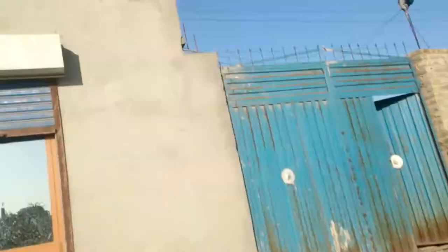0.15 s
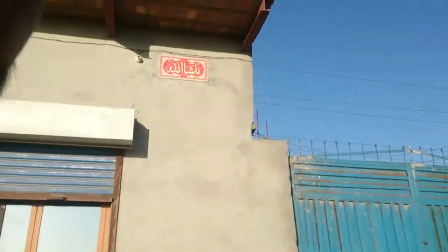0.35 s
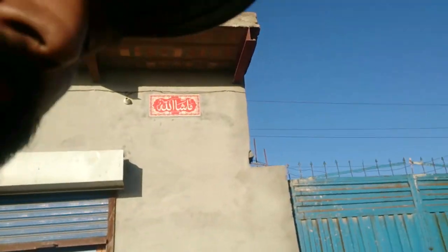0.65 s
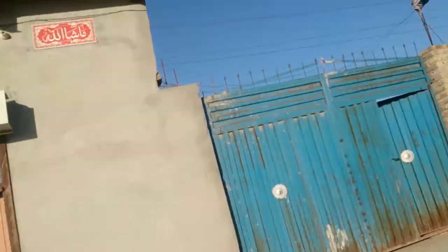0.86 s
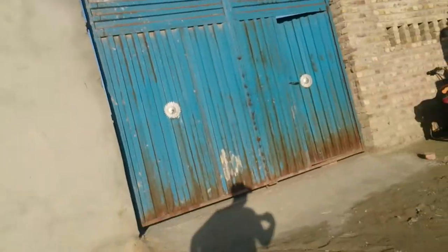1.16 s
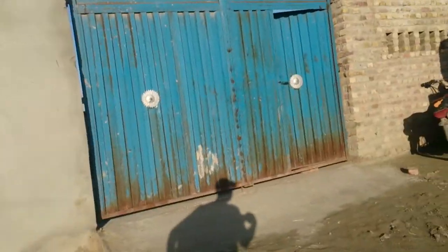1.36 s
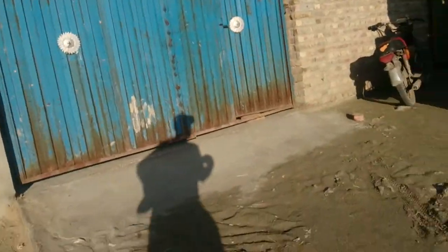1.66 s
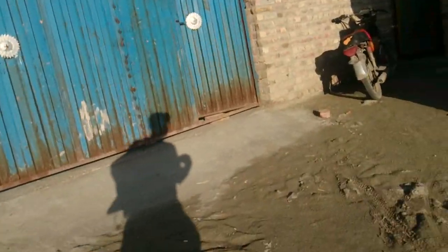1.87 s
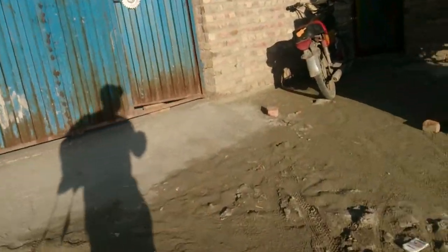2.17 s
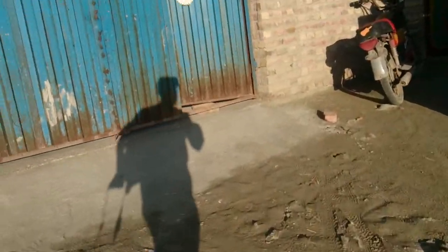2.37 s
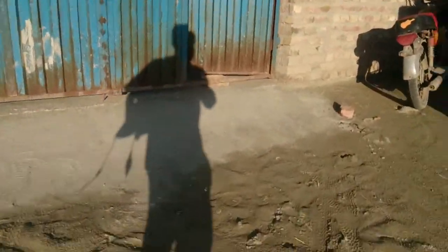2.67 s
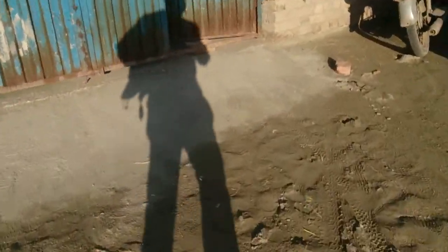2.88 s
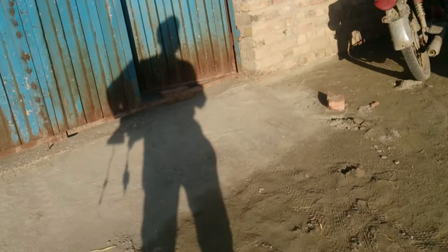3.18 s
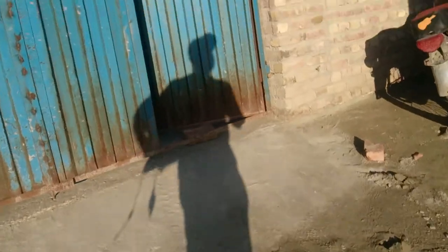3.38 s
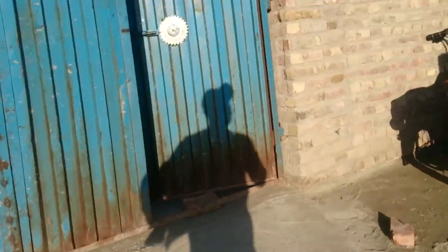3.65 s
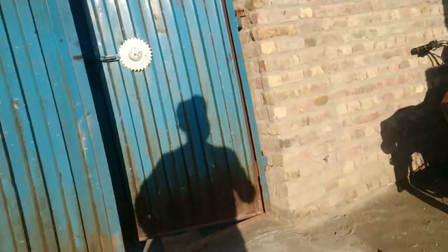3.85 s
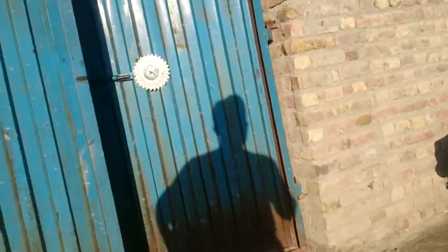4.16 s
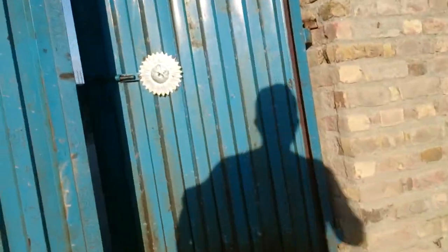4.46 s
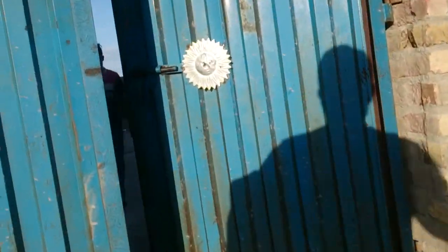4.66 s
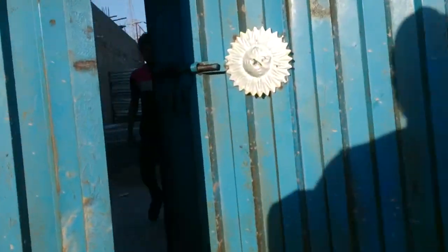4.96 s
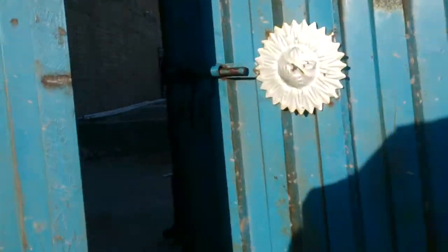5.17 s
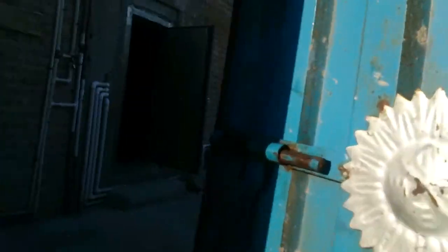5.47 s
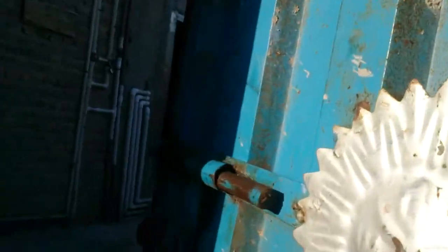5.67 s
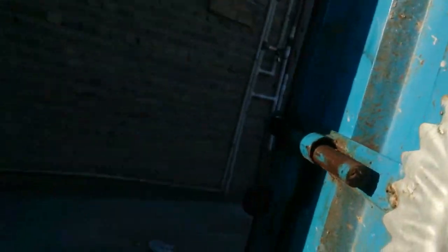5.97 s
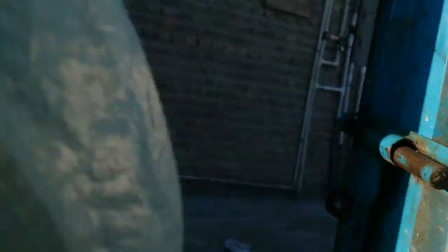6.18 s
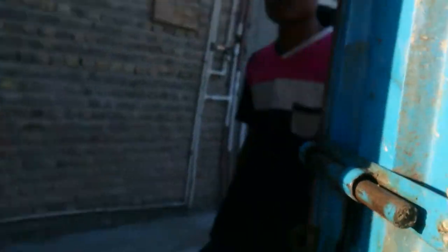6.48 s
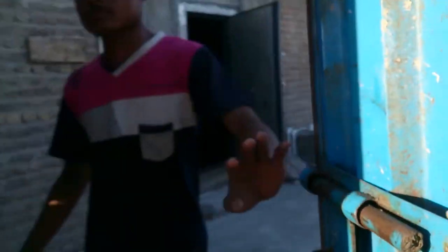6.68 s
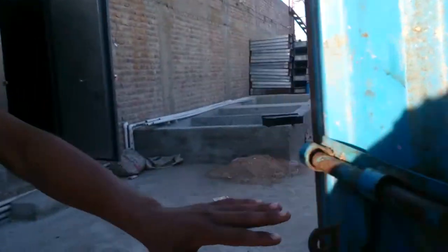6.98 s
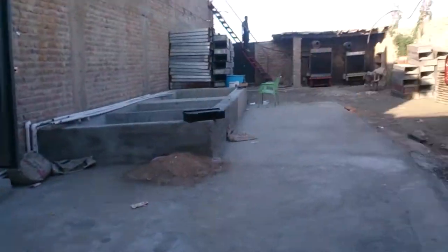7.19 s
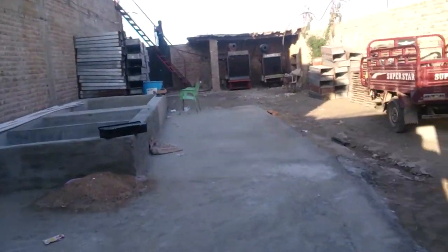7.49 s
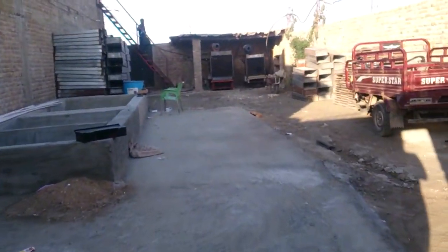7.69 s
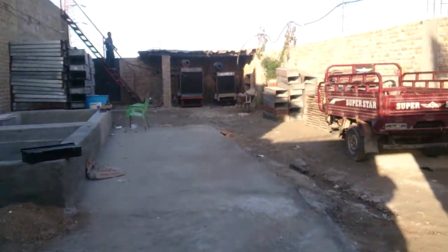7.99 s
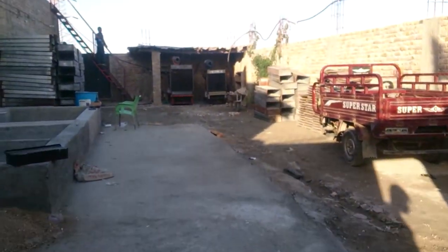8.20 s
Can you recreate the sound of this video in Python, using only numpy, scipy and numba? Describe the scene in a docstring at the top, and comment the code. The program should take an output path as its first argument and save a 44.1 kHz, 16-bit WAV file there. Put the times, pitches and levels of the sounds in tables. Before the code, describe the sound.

Handheld phone outdoors, walking toward a steel gate. A heavy engine thumps almost thirteen times a second behind it, with low drone and hollow ringing notes. Early finger knocks and soft air puffs come first, then a scraping metal bolt bang with a dull sheet boom. The beat grows strong, clothing rustles close by, and finally knock, rattle and whirr are loud and clear.

```python
"""A walled yard with a big slow diesel thudding in a building; a phone is carried up the lane to its gate.
The steel gate is unbolted with a bang: the exhaust beat swells in the gap, then the full clatter opens up.
Timed pulses ring pipe, engine house and echoes for the engine; shaped noise makes its rattle and rough gas.
Noise in short swells makes bolt, gate, grit, scuffs and cloth; fingers bump the phone, and air moves over
the microphones."""
import sys
import numpy as np
from scipy import signal
from scipy.fft import rfft, irfft
from scipy.io import wavfile
from scipy.ndimage import uniform_filter1d, map_coordinates
from numba import njit

SR = 44100
rng = np.random.default_rng(int(sys.argv[2]) if len(sys.argv) > 2 else 0)


def transcribe(signal):
    """Save signal, clipped to [-1, 1], as a 16-bit WAV file at the path in sys.argv[1]."""
    frames = np.atleast_2d(signal).T
    limited = np.clip(frames, -1, 1)
    pcm = np.round(limited * 32767).astype(np.int16)
    wavfile.write(sys.argv[1], SR, pcm)


N = 367794
TIME = np.arange(N) / SR
FREQ = np.maximum(np.fft.rfftfreq(N, 1 / SR), 1)

# exhaust beat, loudest in line with the gap in the gate [t/s, level/dB]
THUD_LEVEL = [(0.0, -26.5), (1.85, -29.5), (2.5, -28.5), (3.6, -28.5), (4.3, -24.5), (5.7, -13),
              (6.5, -10.5), (7.1, -13), (7.6, -17.5), (8.34, -20)]


def undb(db):
    """Decibels to gain."""
    return 10 ** (np.asarray(db) / 20)


def curves(table):
    """Each column of a table, joined by straight lines in time."""
    s, *columns = np.transpose(table)
    return [np.interp(TIME, s, column) for column in columns]


def unit(x):
    """Scale so that the middle of the two channels has rms 1."""
    return x / np.std(np.atleast_2d(x).mean(axis=0))


def steady(x):
    """Hold the slow level at 1 and keep the fast flutter."""
    power = uniform_filter1d(x.mean(axis=0) ** 2, size=SR // 4)
    return x / np.sqrt(power)


def colour(x, points):
    """Filter by (Hz, dB) points, falling at 36 dB per octave more beyond the ends; the result has rms 1."""
    hz, db = np.transpose(points)
    octaves_beyond = np.maximum(np.log2(hz[0] / FREQ), 0) + np.maximum(np.log2(FREQ / hz[-1]), 0)
    gain = undb(np.interp(np.log(FREQ), np.log(hz), db) - 36 * octaves_beyond)
    return unit(irfft(rfft(x) * gain, N))


def resonances(modes):
    """Response of a set of damped resonances, side by side."""
    return sum(undb(db) / (1 + 1j * (FREQ / hz - hz / FREQ) * hz / width) for hz, width, db in modes)


def chained(modes):
    """Response of damped resonances, one after the other."""
    return np.prod([resonances([mode]) for mode in modes], axis=0)


def delay(seconds):
    """Response of a plain delay."""
    return np.exp(-2j * np.pi * FREQ * seconds)


def reflect(x, lag_ms):
    """A copy that arrives later by a moving delay."""
    return np.array([np.interp(TIME - lag_ms / 1000, TIME, side) for side in x])


def pan(db):
    """Left and right gains for a level difference, left minus right, at the same mean power."""
    gains = undb(np.array([[1], [-1]]) * db / 2)
    return gains / np.sqrt(np.mean(gains ** 2, axis=0))


def ports(x, alike_hz):
    """Two unrelated signals become a diffuse field: alike in the bass, unrelated in the treble."""
    mid, side = rfft(x)
    side = side * FREQ / np.hypot(FREQ, alike_hz)
    # the sound reaches the right microphone port a little later
    return irfft(np.array([mid + side, (mid - side) * delay(0.00023)]), N)


def hiss(points):
    """Diffuse coloured noise."""
    return colour(ports(rng.standard_normal((2, N)), 590), points)


def room(x, t60):
    """A dense decaying tail for each channel, near the energy of the sound that feeds it."""
    tail = rng.standard_normal((2, N)) * np.exp(-np.log(1000) * TIME / t60)
    return irfft(rfft(x) * rfft(tail / np.linalg.norm(tail[0])), N)


def swell(start, rise, t60):
    """An envelope that grows for a moment and dies away."""
    age = TIME - start
    return np.clip(age / rise, 0, 1) * np.exp(-np.log(1000) * np.clip((age - rise) / t60, 0, 2))


def walk(rate):
    """A smooth random drift with a spread near 1."""
    hold = int(SR / min(rate, 100))
    steps = np.repeat(rng.standard_normal(1024)[:N // hold + 1], hold)[:N]
    return 1.3 * uniform_filter1d(uniform_filter1d(steps, hold), hold)


def grain(size):
    """A fast random level of rms 1, smoothed over a number of samples."""
    return unit(uniform_filter1d(rng.standard_normal(N), size=size))


def strokes(turns, place, scatter_db, jitter_s):
    """One pulse a cycle at a given crank position, each a little different in time and level."""
    chance = rng.standard_normal((int(turns[-1]) + 1, 2))
    times = np.interp(np.arange(len(chance)) + place, turns, TIME, right=2 * TIME[-1])
    times = times + jitter_s * chance[:, 0]
    at = (times * SR).astype(int)
    inside = (at >= 0) & (at < N)
    return np.bincount(at[inside], undb(scatter_db * chance[inside, 1]), N)


def air(opening):
    """Air swells on the microphones with every step in the lane, over a light breeze and a faint hiss."""
    # air pushed by a step [f/Hz, level/dB]
    step_colour = [(25, -13), (45, -4.5), (90, -1), (150, -2.5), (220, -15.5), (400, -25)]
    first_step_s, step_s = .35, .598
    crest_db, lull_db = -25.5, -27.5  # the lull is a drop below the crest
    lull = np.sin(np.pi * (TIME - first_step_s) / step_s) ** 4
    push = colour(rng.standard_normal((2, N)), step_colour) * undb(crest_db + lull_db * lull)
    breeze = colour(rng.standard_normal((2, N)), [(10, 0), (25, -4), (50, -7), (120, -17)])
    gusts = undb(-33 + 4.4 * walk(3.4))
    faint = hiss([(2000, -25.5), (6000, -7.0), (10000, 4.0), (15000, -7.5)]) * undb(-72.5)
    # the steps push mostly at the left microphone, and fade as the gate opens
    return pan(21.5) * push * (1 - opening) + pan(10) * breeze * gusts + faint


def tick(grit, s, db, t60, low, high, side_db):
    """A snap in one band, followed by its faint echo from the walls."""
    echo_db, echo_t60_s = -12, .26
    snap = unit(irfft(grit / (1 + (low / FREQ) ** 5 + (FREQ / high) ** 18), N))
    # a longer snap feeds the walls more
    echo = undb(echo_db) * np.sqrt(t60 / echo_t60_s) * swell(s, 0.012, echo_t60_s)
    return snap * undb(db) * (pan(side_db) * swell(s, .0006, t60) + pan(side_db / 2) * echo)


def walker():
    """Noise in short swells: ticks of grit and latch, grainy scuffs, and cloth buffeting the microphones."""
    # sharp ticks of grit and latch
    # [t/s, level/dB, t60/s, from f/Hz, to f/Hz, left minus right/dB]
    tick_rows = [(1.476, -27.5, 0.063, 900, 2200, -5), (1.487, -29, 0.046, 1490, 3300, -4),
                 (1.733, -28, 0.0091, 8520, 11500, -17), (1.857, -23.5, 0.02, 3660, 5430, -22),
                 (3.799, -7.5, .0045, 5500, 10700, -23), (4.709, -29, 0.045, 3830, 8850, -8),
                 (5.251, -28, .023, 5000, 11000, -20), (5.489, -21, .055, 3005, 6400, -8),
                 (6.107, -21, .008, 5000, 14000, -10), (6.115, -26, .008, 4000, 11000, -6),
                 (6.361, -16.5, 0.0064, 5500, 12840, 13), (6.734, -15.5, .08, 3000, 6000, -12)]
    # scuffs of shoes and cloth [t/s, level/dB, swell/s, t60/s, share of fine airy hiss/0-1]
    scuff_rows = [(.162, -51.5, 0.031, 0.23, 0.94), (.425, -48, 0.036, 0.18, 0.67),
                  (.875, -51.5, 0.0043, 0.16, 0.56), (.92, -61, 0.092, 0.18, 0.6),
                  (1.39, -44.5, 0.12, 0.22, 0.18), (1.474, -37, 0.017, 0.35, 0.47),
                  (4.909, -30.5, 0.023, 0.21, 0.01), (5.04, -33.5, .025, 0.13, 0.13),
                  (5.229, -31, 0.076, 0.2, 0.28), (5.48, -21.5, 0.011, 0.38, 0.16),
                  (5.72, -23, 0.056, 0.28, 0.2), (5.995, -19, 0.012, .1, 0.2),
                  (6.003, -10, 0.02, 0.38, 0.21), (6.024, -21, .008, .08, 0.54),
                  (6.04, -11.5, 0.013, 0.12, 0.33), (6.29, -23.5, 0.016, 0.68, 0.04),
                  (6.421, -31, 0.016, 0.13, 0.38), (6.838, -15.5, 0.056, 0.51, 0.14)]
    # coarse part of the scuffs [f/Hz, level/dB]
    coarse_colour = [(590, -45), (1000, 11), (1650, 11), (2580, 13.5), (3200, 6), (4250, 22.5), (5800, 13),
                     (7470, 5.5), (10900, -7), (15400, -71)]
    # fine airy part of the scuffs [f/Hz, level/dB]
    airy_colour = [(5000, -9), (7500, -10.5), (9500, 6), (15000, -11.5)]
    # cloth flapping past the microphones, then at 7.1 s a last push of air from a step [t/s, level/dB, swell/s,
    # t60/s]
    flap_rows = [(6.1, -10, 0.018, 0.84), (6.202, -9.5, 0.04, 0.42), (6.31, -7, 0.028, 0.31),
                 (7.1, -16, 0.058, 0.57)]
    grit = rfft(ports(rng.standard_normal((2, N)), 9000))
    ticks = sum(tick(grit, *row) for row in tick_rows)
    # each part crackles on its own
    coarse = hiss(coarse_colour) * undb(2.6 * grain(70))
    airy = hiss(airy_colour) * undb(2.6 * grain(70))
    scuffs = 0
    for s, db, rise, t60, fine in scuff_rows:
        scuffs = scuffs + ((1 - fine) * coarse + fine * airy) * undb(db) * swell(s, rise, t60)
    flapping = sum(undb(db) * swell(s, rise, t60) for s, db, rise, t60 in flap_rows)
    buffet = hiss([(20, -13), (45, -2), (100, 0), (190, -3), (320, -14)]) * flapping
    return ticks + pan(-7.0) * scuffs + buffet


def fingers():
    """A soft fingertip gives the right side of the phone one push a bump, and the case thuds briefly."""
    # fingers bumping the phone, level ahead of the panning [t/s, level/dB, contact/ms]
    bump_rows = [(.199, -24, .4), (.3137, -9, .22), (.3215, -18, .19), (.3696, -7, .26), (.394, -18, .24),
                 (.401, -2.5, .205), (.478, -22, .3)]
    # thud of the case [f/Hz, level/dB]
    case_colour = [(80, -34), (300, 9.5), (900, 2.5), (2200, -21), (3000, -19)]
    push = sum(undb(db) * np.exp(-((TIME - s) * 1000 / ms) ** 2) for s, db, ms in bump_rows)
    case = hiss(case_colour) * sum(undb(db - 16) * swell(s, 0.001, 0.03) for s, db, ms in bump_rows)
    return pan(-18) * (push + case)


def gate():
    """The bolt catches, shrieks and grinds home, each stage in its own band; the sheet steel booms."""
    # stages of the bolt: catch, shriek, ring, grind, groan of the leaf, last slip
    # [t/s, level/dB, swell/s, t60/s, from f/Hz, to f/Hz]
    bolt_rows = [(2.194, -24, .006, .14, 2150, 3050), (2.202, -16.5, .004, 0.12, 6800, 11800),
                 (2.205, -20, 0.012, .17, 3900, 5000), (2.204, -19.5, .008, 0.24, 2000, 15000),
                 (2.209, -24, 0.02, 0.34, 1100, 1750), (2.239, -33.5, .006, 0.23, 2200, 11800)]
    # scrape of the bolt [f/Hz, level/dB]
    bolt_colour = [(530, -34), (900, -13), (1180, -6), (1570, -4.5), (2000, -5.5), (2700, -0.5),
                   (3300, -1.5), (4250, -5.5), (5600, -7.5), (6930, -12), (8600, -12), (10100, -10.5),
                   (11600, -12), (12600, -17.5), (15400, -20.5)]
    # ringing of the bolt [f/Hz, width/Hz, level/dB]
    bolt_modes = [(1540, 90, -1), (2250, 90, 2), (2630, 80, -3.5), (4180, 170, 4.5), (6830, 90, 3),
                  (7850, 200, 2), (8400, 130, 5.5), (11100, 170, 9)]
    # dull booms of the gate and heavy steps [t/s, level/dB, swell/s, t60/s]
    boom_rows = [(1.47, -21, 0.0091, 0.56), (2.199, -14.5, 0.037, 0.49), (2.266, -9.5, 0.006, 0.088),
                 (2.305, -19, 0.0087, 0.36), (2.738, -25, 0.0067, 0.16)]
    # boom of the sheet steel [f/Hz, level/dB]
    gate_colour = [(60, -22), (100, 3), (150, -5.5), (320, 0.5), (500, -14.5), (750, -22), (1000, -25.5),
                   (1500, -31), (1900, -26)]
    shudder = undb(1.5 * grain(90))
    scrape = hiss(bolt_colour)
    ring = unit(irfft(rfft(scrape) * resonances(bolt_modes), N))
    metal = rfft(scrape + 0.8 * ring)
    bolt = 0
    for s, db, rise, t60, low, high in bolt_rows:
        band = unit(irfft(metal / (1 + (low / FREQ) ** 16 + (FREQ / high) ** 16), N))
        bolt = bolt + band * undb(db) * swell(s, rise, t60)
    boom = hiss(gate_colour) * sum(undb(db) * swell(s, rise, t60) for s, db, rise, t60 in boom_rows)
    return shudder * pan(-2.2) * bolt + pan(-1.1) * boom


def ringing(turns):
    """Once a cycle a knock sets a hollow note of the engine house ringing, now harder, now softer."""
    # the hollow note, two resonances in a row [f/Hz, width/Hz, level/dB]
    note_modes = [(332, 16, 0), (342, 80, 0)]
    # loudness of the hollow note [t/s, level/dB]
    note_level = [(0, -47), (2.5, -49), (2.9, -39.5), (3.17, -26), (3.45, -35.5), (3.9, -36.5),
                  (4.15, -25.5), (4.42, -45.5), (4.7, -24), (4.83, -31), (5.05, -18.5), (5.35, -48),
                  (5.9, -49), (6.3, -36), (6.58, -23), (6.85, -48), (7.5, -41.5), (7.77, -17), (8.05, -38),
                  (8.34, -15)]
    knocks = rfft(strokes(turns, place=.2, scatter_db=3, jitter_s=.0002))
    note = unit(irfft(knocks * chained(note_modes), N))
    breath = hiss([(280, -14.5), (335, -2.0), (400, -9.5)])
    return pan(-1.5) * steady(note + 0.39 * breath) * undb(curves(note_level)[0])


def exhaust(turns):
    """Each firing thumps the pipe, echoes round the yard and keeps the engine house droning."""
    # exhaust pipe and silencer, one after the other [f/Hz, width/Hz, level/dB]
    pipe_modes = [(128, 34, 6), (155, 120, 0)]
    # low modes of the engine house [f/Hz, width/Hz, level/dB]
    house_modes = [(38, 8, -19.5), (51, 9, -34), (73.2, 12, 10.5), (93, 18, 8), (99.8, 5.9, 24)]
    # exhaust paths round the yard [delay/s, gain]
    yard_paths = [(0, .8), (.0075, 1), (.0325, .75), (.052, .2), (.0635, .12)]
    # weight of the smeared beat, arriving by many reflections, and its gas noise [t/s, gain]
    smear_share = [(0, .4), (3.8, .37), (4.4, .19), (5.9, .12), (6.6, .18), (7.1, .38), (8.34, .55)]
    drone_db, drone_slope = -21.5, 0.33  # dB when the thud is at 0 dB; dB per dB of thud
    thud_db, = curves(THUD_LEVEL)
    # from the left in the lane to nearly ahead at the gate (s; left minus right, dB)
    pan_db = np.interp(TIME, [0, 4.5], [8, -1.5])
    puffs = rfft(strokes(turns, place=.415, scatter_db=2.2, jitter_s=.00015))
    paths = sum(gain * delay(s) for s, gain in yard_paths)
    direct = irfft(-puffs * chained(pipe_modes) * paths, N)
    direct = colour(direct, [(70, -21.5), (120, -2.0), (190, 5.0), (260, -11.5), (450, -18)])
    # the beat is crisp in line with the gap, and smeared behind the gate or inside the yard
    gas = hiss([(40, -40), (95, 10), (170, 3.5), (230, -9.0), (300, -41.0)])
    smeared = unit(ports(room(direct, t60=.36), 300)) + gas
    thud = steady(direct + curves(smear_share)[0] * smeared)
    house = resonances(house_modes) * resonances([(75.7, 9, 0)]) * delay(0.02166)
    drone = unit(irfft(puffs * house, N))
    # the drone follows the thud, but less steeply
    return pan(pan_db) * (thud * undb(thud_db) + drone * undb(drone_db + drone_slope * thud_db))


def bark(turns):
    """Rough gas leaves the pipe with each firing and slaps back from the wall, never twice alike."""
    # rough gas [f/Hz, level/dB]
    gas_colour = [(240, -12.5), (330, -0.5), (480, 1.5), (650, -5), (1000, -11.5), (1500, -16), (2500, -32)]
    level_db, slope = -17.5, 1.16  # dB when the thud is at 0 dB; dB per dB of thud
    puffs = strokes(turns, place=.22, scatter_db=3.5, jitter_s=.001)
    slaps = strokes(turns, place=.56, scatter_db=3.5, jitter_s=.001)
    # each puff swells and fades with a time constant of 4.5 ms
    age = TIME[:SR // 10] / .0045
    fading = signal.fftconvolve(puffs + .6 * slaps, age * np.exp(1 - age))[:N]
    gas = colour(ports(fading * rng.standard_normal((2, N)), 900), gas_colour)
    return pan(-1.5) * gas * undb(level_db + slope * curves(THUD_LEVEL)[0])


def clatter(turns, repeat, t60, ring_s, rattle):
    """Metal blows ring the engine house on every cycle; loose parts rattle at random after each."""
    # valves, piston slap and combustion within one cycle [share of the cycle, level/dB]
    blow_rows = [(0.14, 7.5), (0.269, 7.5), (.53, 5.5), (0.629, 8.5), (0.76, 6.5), (0.909, 4.5)]
    blows = sum(undb(db) * strokes(turns, place, scatter_db=2.1, jitter_s=.00008) for place, db in blow_rows)
    fading = signal.lfilter([1], [1, -np.exp(-1 / (ring_s * SR))], blows ** 2)
    loose = unit(np.sqrt(1 + rattle * fading / fading.mean()) * rng.standard_normal((2, N)))
    # four patterns of echoes drift in and out, so no ringing line stays for long
    echoes = steady(sum(walk(3) * room(blows, t60) for _ in range(4)))
    return ports(loose + repeat * echoes, 1660)


def patchy(x, opening):
    """Narrow bands swell and sink on their own as the listener moves among the echoes; less in the open."""
    depth_db, changes_per_s = 3.8, 11  # depth behind a shut gate
    hz, s, bins = signal.stft(x, SR, nperseg=2048)
    field = rng.standard_normal((160, 200))
    # bands widen with frequency
    row = 10 * np.log2(1 + hz / 250) + hz / 250
    place = np.meshgrid(row, s * changes_per_s, indexing="ij")
    depth = depth_db * (1 - 0.48 * np.interp(s, TIME, opening))
    gain = undb(depth * map_coordinates(field, place, order=1, mode="mirror"))
    return signal.istft(bins * gain, SR)[1][:, :N]


def machinery(turns, opening):
    """Block rumble, combustion roar, diesel knock and gear whirr, muffled by the gate until it opens."""
    # colours behind the shut gate and in the open yard [f/Hz, level/dB]
    shut_block, open_block = [(130, -12), (220, 5), (270, -3.5), (296, -1.5), (333, 4), (371, -10.5),
                              (450, 0.5), (560, -21.5), (730, -38), (1230, -120)], [(130, -7.5), (205, -4.5), (275, -2.5), (305, -4.5),
                                                  (334, -2), (377, -8), (414, -6), (486, -7), (560, -4),
                                                  (730, -16), (1230, -120)]
    shut_roar, open_roar = [(320, -20.5), (550, -5), (780, -7.5), (880, -6), (975, -3), (1030, -18),
                            (1090, -10.5), (1360, -26), (2310, -120)], [(320, -38.5), (550, -17.5), (630, -1.5), (800, 6.5),
                                               (940, 5), (1040, -16.5), (1360, -22.5), (2310, -120)]
    shut_knock, open_knock = [(620, -34.5), (1050, -1.5), (1340, 5.5), (1530, 7.5), (1700, 5.5),
                              (1830, 4.5), (2200, 2.5), (2560, -0.5), (2820, -27), (3640, -47.5),
                              (6160, -120)], [(620, -6.5), (1050, 2.5), (1210, 3), (1680, -5),
                                                  (1960, -3.5), (2290, 4), (2560, -1), (2790, -7.5),
                                                  (3100, -17.5), (4030, -30), (6820, -120)]
    shut_whirr, open_whirr = [(1710, -44), (2900, -9), (3190, -11.5), (3950, 2), (4630, 2), (5270, -6.5),
                              (6260, -22), (7600, -40.5), (10500, -56), (15000, -73)], [(1710, -45), (2800, -20), (3150, -8.5), (3600, 0),
                                                  (4080, -4), (4800, 1), (5600, -5.5), (7490, -19.5),
                                                  (10200, -19), (12300, -32), (14400, -37), (15400, -41)]
    # diesel knock, growing as the phone comes nearer [t/s, level/dB]
    knock_level = [(0.0, -55), (1.2, -51), (2.6, -46), (4.3, -40.5), (5.4, -31), (6.7, -26.5), (7.1, -24),
                   (7.55, -17.5), (8.0, -14), (8.34, -16)]
    # low rumble and midrange roar [t/s, rumble level/dB, roar level/dB]
    low_levels = [(0.0, -37, -45.5), (0.3, -28.5, -40), (0.6, -35, -45), (1.2, -33.5, -41.5),
                  (1.95, -30, -43.5), (2.7, -24, -36.5), (3.7, -30.5, -31.5), (4.45, -24, -33.5),
                  (5.0, -23.5, -33), (5.55, -25.5, -29), (6.3, -22.5, -27.5), (7.0, -19.5, -27),
                  (7.5, -21.5, -20), (8.34, -16.5, -20)]
    # level and direction of the treble [t/s, level/dB, left minus right/dB]
    treble_level = [(0.0, -81, 0), (1.3, -63, -15), (1.7, -48, -10), (2.6, -38, -11.5), (3.3, -36, -11),
                    (3.85, -28, -19.5), (4.4, -36, -13.5), (5.3, -33.5, -7.5), (6.3, -29.5, -16),
                    (6.9, -28.5, -3.5), (7.3, -18.5, -4.5), (7.55, -19, -3.5), (7.95, -16.5, -5),
                    (8.34, -19, -5.5)]
    # reflection from the nearest wall or gate leaf [t/s, lag/ms, strength/0-1]
    wall_rows = [(0, .83, .6), (.6, .56, .8), (1.2, .67, .9), (2, .64, .6), (2.5, .42, .8), (4.4, .44, .55),
                 (4.85, .6, .5), (5.15, .85, .8), (5.5, 1.25, .5), (6.3, .98, .45), (6.8, 1.3, .3),
                 (7.2, 1.1, .4), (7.55, 1.45, .35), (8, 1.8, 0)]
    knock_db, = curves(knock_level)
    block_db, roar_db = curves(low_levels)
    whirr_db, whirr_pan_db = curves(treble_level)
    lag_ms, strength = curves(wall_rows)

    def through_gate(x, shut, clear, leak=1):
        """Blend from the colour behind the gate to the colour in the open; the level flutters."""
        share = np.clip(leak * opening, 0, 1)
        blend = (1 - share) * colour(x, shut) + share * colour(x, clear)
        return steady(blend) * undb(1.0 * walk(35))

    def past_walls(x):
        """Walking shifts each reflection, so hollows and ridges drift through the sound."""
        x = x + .25 * reflect(x, 3.5 + .7 * walk(1.5))
        # ribbed steel and brick scatter the treble, so only the lows are mirrored
        mirrored = irfft(rfft(x) / (1 + (FREQ / 1300) ** 4), N)
        return patchy(x + np.clip(strength, 0, 1) * reflect(mirrored, lag_ms), opening)

    low = past_walls(clatter(turns, repeat=1.1, t60=0.16, ring_s=0.008, rattle=1.2))
    high = past_walls(clatter(turns, repeat=0.9, t60=0.42, ring_s=0.007, rattle=1.1))
    block = through_gate(low, shut_block, open_block) * undb(block_db)
    roar = through_gate(low, shut_roar, open_roar) * undb(roar_db)
    knock = through_gate(high, shut_knock, open_knock, leak=2.7) * undb(knock_db)
    whirr = through_gate(high, shut_whirr, open_whirr) * undb(whirr_db)
    return block + pan(-1.8) * (roar + knock) + pan(whirr_pan_db) * whirr


@njit
def sweep(x, hz, width):
    """A band-pass whose centre moves, gain 1 at the centre; the width is a share of the centre."""
    y, band, low = np.empty(len(x)), 0., 0.
    for i in range(len(x)):
        g = np.tan(np.pi * hz[i] / SR)
        v = (band + g * (x[i] - low)) / (1 + g * (g + width))
        band, low, y[i] = 2 * v - band, low + 2 * g * v, width * v
    return y


def ridges(x):
    """Walls and the gap in the gate favour one narrow band for a while; it glides as the phone moves."""
    # narrow bands that stand out for a while, one list each [t/s, f/Hz, lift/dB]
    ridge_lists = [
        [(.4, 700, 2), (.7, 690, 15), (1.3, 665, -7), (1.7, 624, 13), (2.0, 610, 10.5), (2.25, 600, 0)],
        [(.5, 2280, 5), (1.0, 2000, 8), (1.5, 1943, 10), (2.1, 1880, -1)],
        [(2.55, 970, 0.5), (2.8, 934, 9), (3.7, 960, 3.5), (4.3, 931, -2)],
        [(4.85, 1440, -6), (5.05, 1380, 11), (5.28, 1240, -4), (5.46, 1137, 15), (5.7, 940, 0.5)],
        [(5.7, 469, 0.5), (5.95, 483, 10.5), (6.3, 490, -9), (6.9, 523, 8.5), (7.3, 450, 3.5)],
        [(6.4, 1500, 4.5), (6.7, 1500, 5.5), (7.15, 1505, 12), (7.35, 1560, 1.5)],
    ]
    out = x
    for table in ridge_lists:
        hz, db = curves(table)
        narrow = np.array([sweep(np.ascontiguousarray(side), hz, 0.058) for side in x])
        out = out + (undb(db) - 1) * narrow
    return out


def scene():
    """One crankshaft drives exhaust and machinery; gate and walker sound close by."""
    # engine speed [t/s, firings per second]
    engine_speed = [(0, 12.685), (5.3, 12.683), (6.2, 12.64), (8.34, 12.665)]
    # how far the gate stands open to the phone [t/s, share/0-1]
    gate_share = [(0, 0.02), (4.4, 0.04), (5.3, 0.34), (6.6, 0.35), (7.3, 1), (8.34, 1)]
    turns = np.cumsum(curves(engine_speed)[0]) / SR  # firing cycles so far
    opening = np.clip(curves(gate_share)[0], 0, 1)
    engine = exhaust(turns) + bark(turns) + ringing(turns) + ridges(machinery(turns, opening))
    return engine + gate() + fingers() + walker() + air(opening)


def record(dry):
    """The phone rounds off the loudest peaks and cuts the top above 15.4 kHz."""
    rounded = dry / (1 + dry ** 8) ** (1 / 8)
    top_cut = signal.ellip(8, .2, 60, 15400, fs=SR, output="sos")
    return signal.sosfilt(top_cut, rounded)


dry = scene()
out = record(dry)
transcribe(out)
```